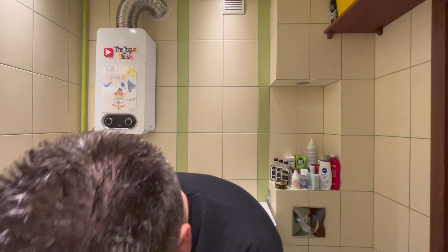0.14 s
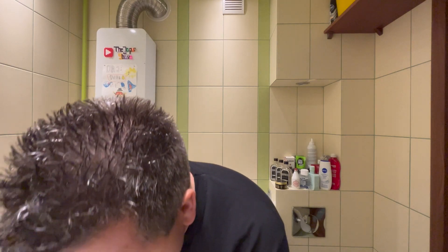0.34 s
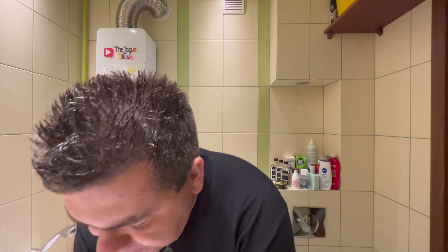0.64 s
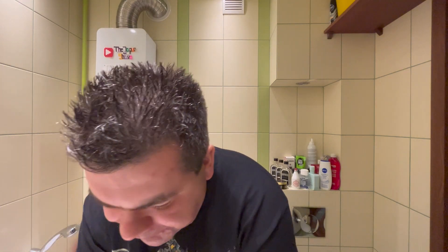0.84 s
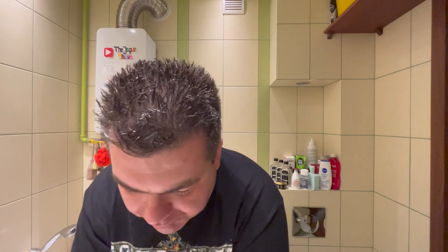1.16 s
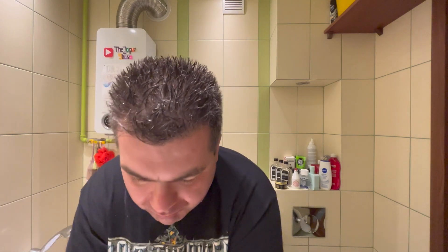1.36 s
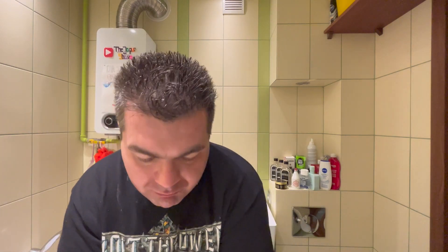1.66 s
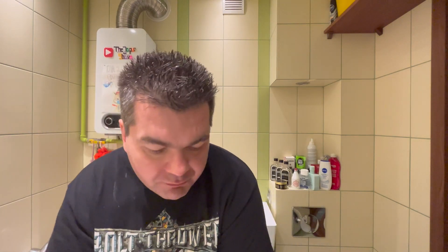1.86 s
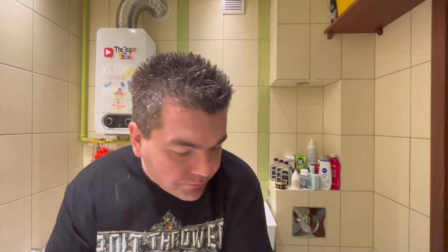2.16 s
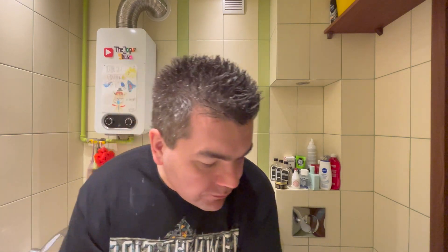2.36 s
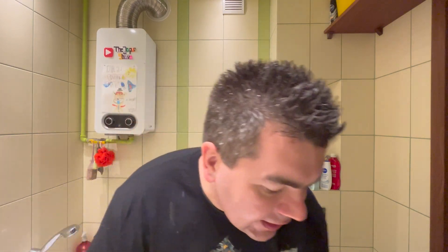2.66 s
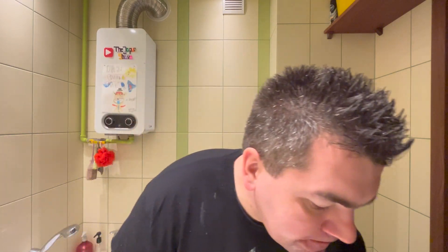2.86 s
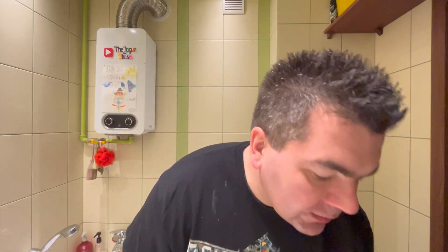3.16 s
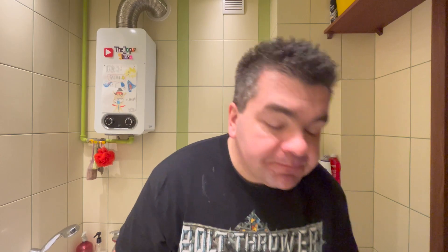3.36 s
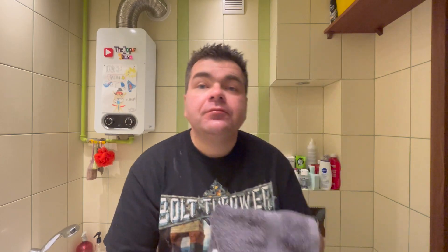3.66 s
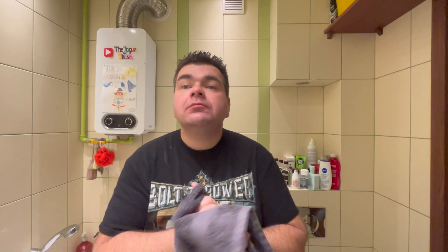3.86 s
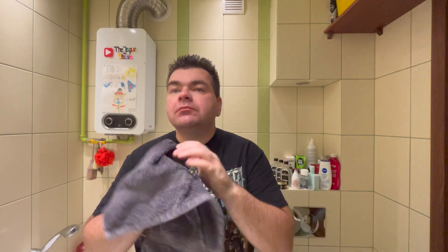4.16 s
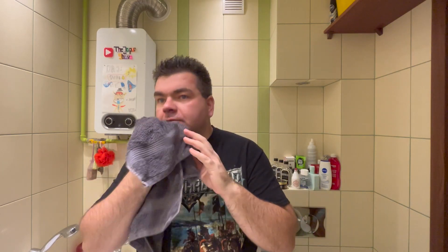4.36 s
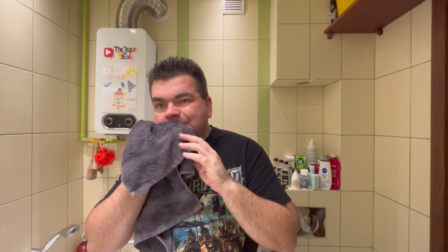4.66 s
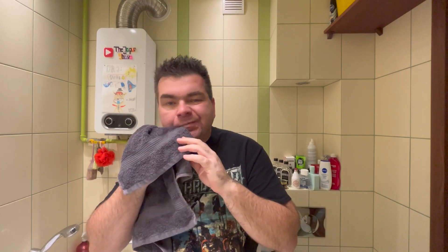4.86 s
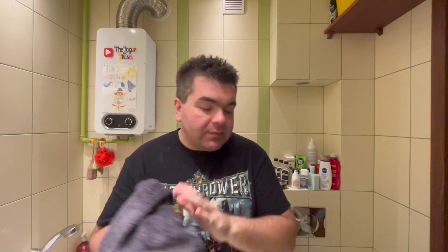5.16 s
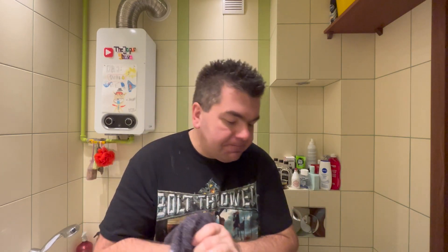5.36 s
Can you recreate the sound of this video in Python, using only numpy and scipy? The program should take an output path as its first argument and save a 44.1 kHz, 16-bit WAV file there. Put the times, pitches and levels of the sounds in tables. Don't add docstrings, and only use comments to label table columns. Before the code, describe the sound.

A close stereo sound in a small tiled bathroom, stronger on the right, with brief dense echoes. From about 0.1 s something wet plunges into a basin, with a hard splash near 0.23 s. Stirring follows in uneven bursts: ringing bubbles, squelchy pops, churning and bright crackling slaps, strongest around 0.65, 0.76 and 0.95 s. It thins after 1.3 s, with one last sharp splash at 1.68 s and low soft bumps as the water is left by 1.9 s. Small high drips tick from 2.1 s. A crisp flick at 2.45 s sets off a short low hum, more drops patter until 2.75 s, and a second snappy flick comes at 3.1 s. Then it is much quieter: towel fibres rustle and rub in soft swells, with weight shifting on the floor around 3.6 to 3.9 s. A faint click at 5.04 s precedes a dull low thud at 5.2 s and final cloth movement.

```python
import sys
import numpy as np
from scipy import signal
from scipy.fft import rfft, irfft
from scipy.io import wavfile

SR = 44100
rng = np.random.default_rng(int(sys.argv[2]) if len(sys.argv) > 2 else 0)


def int16_out(signal):
    q = np.round(np.clip(np.atleast_2d(signal).T, -1, 1) * 32767)
    wavfile.write(sys.argv[1], SR, q.astype(np.int16))


def nominal_scale(level):
    x = np.asarray(level, float) / 20
    return 10 ** x


N = 242991
TIME = np.arange(N) / SR
WATER_ENDS_S = 1.92


def rms_one(x):
    return x / np.sqrt(np.mean(x ** 2) + 1e-20)


def at_hz(points, hz):
    table_hz, values = np.transpose(points)
    return np.interp(np.log(hz + 1), np.log(table_hz), values)


def coloured(x, spectrum):
    length = x.shape[-1]
    gain = nominal_scale(at_hz(spectrum, np.fft.rfftfreq(length, 1 / SR)))
    return irfft(rfft(x) * gain, length)


def filtered(x, order, hz, kind):
    return signal.sosfilt(signal.butter(order, hz, kind, fs=SR, output="sos"), x)


def resonate(x, hz, width_hz):
    r = np.exp(-np.pi * width_hz / SR)
    return signal.lfilter([(1 - r * r) / 2, 0, (r * r - 1) / 2], [1, -2 * r * np.cos(2 * np.pi * hz / SR), r * r], x)


def add(out, s, sound):
    i = round(s * SR)
    out[..., i:i + sound.shape[-1]] += sound[..., :N - i]


def panned(x, left_db):
    lag_s = 0.000285
    samples = np.arange(len(x))
    late = np.interp(samples - lag_s * SR, samples, x)
    return np.array([x, late]) * nominal_scale(np.array([[left_db], [-left_db]]) / 2)


def drift(per_s):
    return rms_one(filtered(rng.standard_normal(N + SR), 2, per_s, "low")[SR:])


def swells(peak_s, rise_s, fall_s, peak_db, under_db):
    drop_db, curve = 22, 1.32
    t = TIME[::40, None]
    before = (peak_s - t) / np.maximum(rise_s, .005)
    after = (t - peak_s) / np.maximum(fall_s, .005)
    away = np.minimum(np.maximum(before, after), 9)
    power = nominal_scale(2 * (peak_db - drop_db * away ** curve)).sum(axis=1)
    return 10 * np.log10(nominal_scale(2 * under_db) + np.interp(TIME, t[:, 0], power))


# [peak t/s, fall/s, cloth rumble level/dB, footfall level/dB]
WEIGHT_SHIFTS = [(0.4, 0.76, -70, -76), (0.88, 0.41, -59.5, -74), (1.19, 0.66, -54.5, -59.5),
                 (1.4, 0.2, -57, -68), (1.73, 0.31, -53.5, -61), (2.02, 0.14, -57.5, -65),
                 (2.49, 0.16, -92, -58.5), (2.85, 0.24, -67.5, -89), (3.11, 0.38, -61.5, -67),
                 (3.62, 0.14, -55, -53), (3.7, 0.14, -48, -53.5), (3.87, 0.17, -56.5, -54),
                 (4.1, 0.12, -55.5, -80), (4.22, 0.34, -63.5, -62), (4.8, 0.98, -65.5, -70),
                 (5.17, 0.043, -57, -70), (5.228, 0.088, -37, -34.5), (5.36, 0.15, -57, -58),
                 (5.49, 0.074, -50.5, -50.5)]
RISE_SHARE, STILL_RUMBLE_DB, STILL_FLOOR_DB = 0.83, -82, -85
HEAVY_STEP_DB, HEAVY_QUICKENING = -51.5, 0.5


def weight():
    s, fall, rumble_db, footfall_db = np.transpose(WEIGHT_SHIFTS)
    heaviness_db = np.maximum(footfall_db - HEAVY_STEP_DB, 0)
    rise = RISE_SHARE * fall * nominal_scale(-HEAVY_QUICKENING * heaviness_db)
    return (swells(s, rise, fall, rumble_db, STILL_RUMBLE_DB),
            swells(s, rise, fall, footfall_db, STILL_FLOOR_DB))


# [f/Hz, density/dB per Hz]
CLOTH_RUMBLE = [(59, -56.5), (100, -26), (199, 9), (232, -3.5), (318, 4), (500, -0.5), (650, -4),
                (1100, -120)]
# [f/Hz, density/dB per Hz]
FLOOR_TREAD = [(13, -33), (22, -24.5), (47, 2.5), (120, 5), (160, -5.5), (260, -120)]


def rumble():
    total = 0
    for level_db, spectrum in zip(weight(), [CLOTH_RUMBLE, FLOOR_TREAD]):
        mid, side = rng.standard_normal((2, N))
        noise = rms_one(coloured(mid + 0.4 * side * [[1], [-1]], spectrum))
        total = total + nominal_scale(level_db + 0.5 * drift(4.6)) * noise
    return total


# [t/s, level/dB]
HAND_EFFORT = [
    (0.096, -58),
    (0.156, -47.5),
    (0.27, -36.5),
    (0.33, -38.5),
    (0.51, -41.5),
    (0.8, -40.5),
    (1.194, -41),
    (1.33, -48.5),
    (1.624, -59),
]


def stirring():
    return np.interp(TIME, *np.transpose(HAND_EFFORT), left=-120, right=-120)


# [peak t/s, rise/s, fall/s, rustle level/dB, hiss level/dB]
MOVEMENTS = [(0.0, .1, 0.15, -53.5, -50), (1.697, 0.15, 0.3, -47, -49), (2.03, 0.15, 0.21, -56.5, -61.5),
             (2.11, 0.064, 0.1, -58.5, -62), (2.471, 0.12, 0.2, -60, -47.5), (2.784, 0.18, 0.5, -60.5, -60),
             (3.1, 0.36, 0.58, -55, -62), (3.42, 0.048, 0.18, -64.5, -87), (3.672, 0.22, 0.41, -52, -54.5),
             (4.06, 0.25, 0.23, -52, -56), (4.31, 0.01, 0.81, -75, -85), (4.375, 0.04, 0.096, -60, -68),
             (4.57, 0.04, 0.18, -64, -64), (4.65, 0.13, 0.13, -62.5, -57), (4.89, 0.23, 0.23, -56, -61),
             (5.039, 0.0067, 0.24, -59, -64), (5.224, 0.054, 0.23, -51.5, -56.5),
             (5.38, 0.066, 0.27, -59, -53.5), (5.49, 0.19, 0.12, -44.5, -55)]
STILL_RUSTLE_DB, STILL_HISS_DB = -82, -72.5


def motion():
    s, rise, fall, rustle_db, hiss_db = np.transpose(MOVEMENTS)
    plunge_s, plunge_length_s = 0.28, 0.021
    depth_db = np.interp(TIME, [plunge_s, plunge_s + plunge_length_s], [-22, 1])
    slosh_under_db = np.maximum(stirring() + depth_db, STILL_RUSTLE_DB)
    spray_under_db = np.maximum(stirring(), STILL_HISS_DB)
    return swells(s, rise, fall, rustle_db, slosh_under_db), swells(s, rise, fall, hiss_db, spray_under_db)


def grains(per_s, low_hz, high_hz, cycles, spread_db):
    sizes = nominal_scale(spread_db * np.minimum(rng.exponential(1, N), 3)) * rng.choice([-1, 1], N)
    clicks = sizes * (rng.random(N) < per_s / SR) + 1e-18
    dealt = rng.integers(0, 14, N)
    total = 0
    for k, hz in enumerate(np.geomspace(low_hz, high_hz, num=14)):
        total = total + resonate(clicks * (dealt == k), hz, 1.8 * hz / cycles) / np.sqrt(hz)
    return rms_one(total)


def patchy(x, edges_hz, depth_db, per_s):
    depth_db = depth_db * np.where(TIME < WATER_ENDS_S, 1, 0.5)
    total = 0
    for k, band_hz in enumerate(zip(edges_hz, edges_hz[1:])):
        total = total + (-1) ** k * filtered(x, 2, band_hz, "band") * nominal_scale(depth_db * drift(per_s))
    return total


def water_then_towel(mix, wet, dry):
    share = np.clip((TIME - WATER_ENDS_S) / 0.011, 0, 1)
    return (1 - share) * rms_one(coloured(mix, wet)) + share * rms_one(coloured(mix, dry))


# [f/Hz, density/dB per Hz]
SPRAY_COLOUR = [(500, -62), (1200, -37), (2000, -39), (2800, 1.5), (4300, -4.5), (5400, -6), (6400, -1.5),
                (7500, -7.5), (10000, -6.5), (12600, -31), (14800, -16), (16000, -21.5)]
# [f/Hz, density/dB per Hz]
FIBRE_COLOUR = [(500, -54), (1200, -5.5), (2000, -10.5), (2800, -14.5), (4300, -11.5), (5600, -12),
                (6000, -6.5), (6700, -7.5), (7200, -11), (10000, -10.5), (12600, -25), (14800, -19),
                (16000, -20.5)]


def spray(level_db):
    fizz = grains(600, 2400, 7500, cycles=14.0, spread_db=4.0)
    mix = rng.standard_normal((2, N)) + 0.55 * panned(fizz, 0)
    mix = patchy(mix, [900, 2600, 3500, 4600, 5800, 7200, 9000, 11000, 13500, 17000], 2.8, 16)
    return nominal_scale(level_db) * water_then_towel(mix, SPRAY_COLOUR, FIBRE_COLOUR)


# [f/Hz, density/dB per Hz]
SLOSH_COLOUR = [(180, -70), (300, -21.5), (556, 0), (790, -7.5), (1050, 0), (1240, 1.5), (1530, 4),
                (3000, -8.5), (3900, -10.5), (6600, -120)]
# [f/Hz, density/dB per Hz]
CLOTH_COLOUR = [(180, -1), (300, -4), (550, -7.5), (742, -6), (801, -4.5), (1320, -7), (3000, -21),
                (3900, -16.5), (6600, -120)]


def slosh(level_db):
    mix = rng.standard_normal((2, N)) + 0.08 * grains(900, 402, 2830, cycles=10.0, spread_db=6.0)
    mix = patchy(mix, [150, 500, 800, 1200, 1700, 2400, 5000], 2.5, 18)
    return nominal_scale(level_db) * water_then_towel(mix, SLOSH_COLOUR, CLOTH_COLOUR)


# [t/s, peak level/dB, f/Hz, swell/s, T60/s]
BASIN_HUMS = [
    (2.455, -38, 165, 0.01, 0.15),
    (3.9, -57, 177, 0.0089, .08),
    (2.32, -60, 210, 0.009, 0.074),
]


def hums():
    out, t = np.zeros(N), TIME[:SR // 3]
    for s, level_db, hz, swell_s, t60 in BASIN_HUMS:
        envelope = nominal_scale(level_db - 60 * t / t60) * (1 - np.exp(-(t / swell_s) ** 2))
        add(out, s, envelope * np.sin(2 * np.pi * hz * t * (1 - .5 * t)))
    return out


# [t/s, peak level/dB, f/Hz, decay/s, puff share/dB]
SOFT_BLOWS = [(1.65, -40, 573, 0.079, 1), (1.694, -45.5, 102, 0.033, -13), (1.775, -40, 122, 0.032, 2.5),
              (1.994, -46.5, 202, 0.033, 6), (2.108, -28.5, 196, 0.0042, -17),
              (2.75, -55.5, 325, 0.015, -12), (3.117, -29.5, 410, 0.013, -2.5),
              (3.465, -46, 1160, 0.0058, -17), (3.563, -46, 495, 0.016, 6), (2.06, -60, 2040, 0.057, -12),
              (4.009, -49, 750, 0.14, 15), (4.289, -46.5, 504, 0.023, 3), (5.21, -32, 430, 0.018, 11),
              (5.228, -39, 65.6, 0.025, 6)]


def thuds():
    out, t = np.zeros(N), TIME[:SR // 4]
    for s, level_db, hz, decay_s, puff_db in SOFT_BLOWS:
        white = rng.standard_normal(len(t))
        puff = filtered(white, 3, [150, 1100], "band")
        ring = resonate(resonate(white, hz, 10 + .2 * hz), hz, 10 + .4 * hz)
        blow = rms_one(rms_one(ring) + nominal_scale(puff_db) * rms_one(puff))
        envelope = (1 - np.exp(-t * hz / 1.9)) * np.exp(-t / max(decay_s, .003))
        add(out, s - .001, nominal_scale(level_db - 1) * envelope * blow)
    return out


# [f/Hz, density/dB per Hz]
SPLASH_COLOUR = [(500, -70), (1200, -32.5), (2000, 4), (4000, 0), (6400, 3), (8400, 13), (11000, 2),
                 (13000, -2), (16000, -5.5)]
# [t/s, peak level/dB, f/Hz, T60/s]
DROPS = [(0.1008, -37, 4300, 0.05), (2.113, -42.5, 5060, .05), (2.1899, -40.5, 4900, 0.063),
         (2.2313, -45.5, 4730, .04), (2.3018, -41, 4920, 0.075), (2.4047, -44, 6600, 0.038),
         (2.505, -38, 3950, .06), (2.549, -46, 3620, .05), (2.605, -41, 3620, 0.064),
         (2.622, -38.5, 5000, 0.06), (2.6673, -43, 6600, .015), (2.695, -26.5, 6700, 0.014),
         (2.7402, -32.5, 4630, 0.024), (3.3937, -54, 5000, .015), (3.4194, -53, 5070, 0.017),
         (3.487, -56, 6200, .015), (5.037, -47, 6860, 0.018), (5.037, -46, 4830, 0.014)]


def drips():
    out, t = np.zeros(N), TIME[:SR // 10]
    sag_per_s = 2.7
    for s, level_db, hz, t60 in DROPS:
        tick = rng.standard_normal(len(t)) * nominal_scale(-60 * t / max(t60, .005))
        sound = resonate(resonate(tick, hz, 700), hz, 700) + 0.047 * coloured(tick, SPLASH_COLOUR)
        sound = np.interp(t * (1 - sag_per_s * t / 2), t, sound)
        add(out, s - .001, nominal_scale(level_db - 4.5) * sound / np.abs(sound).max())
    return out


# [f/Hz, density/dB per Hz]
SNAP_COLOUR = [(500, -60), (1200, -33), (2000, -6), (4000, -5.5), (6400, -2.5), (8400, 5), (11000, -0.5),
               (13000, 1), (16000, -3)]
# [t/s, peak level/dB, low cavity f/Hz, body share/dB, decay/s]
BASIN_SPLASHES = [(0.135, -36, 2520, 3, 0.046), (0.1537, -28, 4540, 13, 0.018),
                  (0.23, -9, 5180, -32.5, 0.0043), (0.2541, -22.5, 3120, 12.5, 0.01),
                  (0.3649, -23, 3700, -23.5, .038), (0.5207, -45, 3780, -18, 0.013),
                  (0.561, -21, 2410, -21, 0.0063), (0.6176, -34, 4180, -13, 0.0077),
                  (0.6446, -14, 2380, 0.5, 0.01), (0.7595, -8.5, 4900, 6, 0.0047),
                  (0.7652, -10.5, 3700, 1, 0.007), (0.8266, -25, 3050, -10, 0.016),
                  (0.833, -16.5, 3200, -15, 0.0078), (0.8396, -16, 2900, -14, 0.013),
                  (0.859, -21.5, 3800, -2, 0.014), (0.9533, -13, 2360, 2.5, 0.012),
                  (1.0262, -31, 2300, 24, 0.023), (1.0362, -23.5, 2900, 9, 0.031),
                  (1.156, -18.5, 2220, -23, 0.026), (1.2606, -25, 4100, -3.5, 0.011),
                  (1.366, -32, 4000, -5, 0.01), (1.3716, -22, 3100, 7, 0.021),
                  (1.4948, -28, 4370, -27, 0.034), (1.6794, -7, 5570, -35, 0.005),
                  (1.689, -23.5, 4480, -23, 0.029), (1.7696, -42, 2260, 18, 0.045)]
# [t/s, peak level/dB, low cavity f/Hz, body share/dB, decay/s]
AIR_FLICKS = [(2.359, -44.5, 5130, -23, 0.02), (2.4433, -26, 4580, -9, 0.013),
              (2.4479, -20.5, 4670, -6, 0.016), (2.455, -25.5, 4200, -6.5, 0.029),
              (2.6948, -31, 4600, -30, 0.0067), (2.7395, -38.5, 4330, 5, 0.026),
              (3.0824, -23.5, 7160, -30, 0.02), (3.0895, -23, 6930, -15, 0.012),
              (3.099, -20, 5190, -3.5, 0.011), (3.1151, -24.5, 4570, 5.5, 0.028),
              (5.036, -45.5, 3000, 11, 0.016)]
# [t/s, f/Hz]
HIGH_CAVITY_PITCH = [
    (0.1, 5600),
    (0.3, 5140),
    (1.0, 6100),
    (1.5, 6700),
    (1.9, 6630),
    (2.45, 8170),
    (2.65, 6550),
    (3.1, 6330),
]


def splashes():
    out, t = np.zeros((2, N)), TIME[:SR // 4]
    width = 0.53
    for s, level_db, low_hz, body_db, decay_s in BASIN_SPLASHES + AIR_FLICKS:
        wet = s < WATER_ENDS_S
        high_hz = np.interp(s, *np.transpose(HIGH_CAVITY_PITCH))
        crackle = rng.standard_normal(len(t) // 30 + 1).repeat(30)[:len(t)]
        white = rng.standard_normal((2, len(t))) * nominal_scale(1.57 * crackle)
        bright = rms_one(coloured(white[0], SPLASH_COLOUR if wet else SNAP_COLOUR))
        bright = rms_one(bright + 4.07 * resonate(bright, high_hz, 900) - 7.2 * resonate(bright, low_hz, 600))
        body = rms_one(resonate(resonate(white[1], 1470, 1200), 1470, 1200))
        rising = 1 - np.exp(-t / (.003 if wet else .0012))
        shape = rising * np.exp(-t / max(decay_s, .002))
        sound = panned(nominal_scale(level_db - 7) * shape * (bright + nominal_scale(body_db - 6.5) * body), -1.5)
        other_drops = nominal_scale(level_db - 3) * shape * bright[::-1]
        sound[0] = (1 - width) * sound[0] + width * other_drops
        add(out, s - .001, sound)
    return out


# [t/s, peak level/dB, f/Hz]
SNAPPING_POCKETS = [(0.106, -35.5, 1290), (0.144, -27.5, 1110), (0.165, -38.5, 1940), (0.165, -20, 1550),
                    (0.228, -22.5, 1550), (0.248, -25, 1710), (0.301, -40.5, 1310), (0.332, -36, 1400),
                    (0.384, -22.5, 990), (0.422, -21, 1140), (0.443, -21.5, 1146), (0.519, -26, 1560),
                    (0.557, -21.5, 2400), (0.557, -17, 2390), (0.618, -26, 1250), (0.648, -18.5, 1134),
                    (0.719, -26, 1690), (0.74, -10.5, 1080), (0.758, -12.5, 946), (0.823, -25.5, 1010),
                    (0.844, -24, 1160), (0.928, -37, 1140), (0.952, -11.5, 1140), (1.025, -13, 1640),
                    (1.12, -19, 1400), (1.131, -23.5, 966), (1.159, -11.5, 1360), (1.214, -35, 1720),
                    (1.245, -25, 1070), (1.261, -20.5, 1530), (1.343, -14.5, 1030), (1.367, -10.5, 1730),
                    (1.495, -28, 1410), (1.602, -49, 1610), (1.61, -35, 1730), (1.646, -27, 845),
                    (1.648, -28, 501), (1.656, -21.5, 546), (1.666, -39, 587), (1.678, -20.5, 583),
                    (1.732, -36, 1920), (1.75, -23.5, 624), (1.76, -20.5, 1450)]


def pops():
    out, t = np.zeros(N), TIME[:SR // 20]
    cycles, trim_db = 11.6, -6.5
    for s, level_db, hz in SNAPPING_POCKETS:
        tone = np.sin(2 * np.pi * hz * t * (1 + 8.0 * t)) * nominal_scale(-60 * t * hz / cycles)
        add(out, s - .001, nominal_scale(level_db + trim_db) * tone)
    return filtered(out, 3, 350, "high")


# [t/s, peak level/dB, f/Hz, longer ring/dB]
SMALL_POCKETS = [(0.0898, -38.5, 1255, -6), (0.1029, -29, 1246, -6.5), (0.1674, -14, 1650, -7.5),
                 (0.1793, -19, 1520, -6.5), (0.1852, -24, 1462, -2), (0.202, -30.5, 1445, 3),
                 (0.228, -21, 1592, -4), (0.3041, -29, 1313, -3), (0.3304, -32, 1380, -1),
                 (0.3906, -28.5, 2036, 0), (0.4437, -21.5, 1540, -2), (0.5216, -23.5, 1505, -4),
                 (0.5576, -24.5, 2270, -1), (0.616, -33, 1230, -3), (0.6465, -28.5, 2166, 0),
                 (0.7211, -18, 1634, 2), (0.736, -29, 1700, -4.5), (0.8585, -22, 1728, -4),
                 (0.9513, -22, 2230, -2), (1.024, -20, 1657, 0), (1.046, -23, 1800, -2),
                 (1.1209, -19, 1393, 0), (1.14, -25, 1454, 0.5), (1.163, -18.5, 1344, -1),
                 (1.178, -29, 1440, -4), (1.26, -18.5, 1500, -1.5), (1.344, -33, 1295, -10.5),
                 (1.3721, -19.5, 1650, -5.5), (1.494, -34.5, 1394, -10.5), (1.6013, -43, 1550, -5),
                 (1.6474, -39, 1930, 0.5), (1.6786, -33.5, 1885, -3), (1.681, -27, 1380, -3.5),
                 (1.732, -38.5, 2030, -1), (1.749, -39, 1683, 2), (1.772, -33, 1496, -5),
                 (1.785, -28.5, 1406, 1.5), (1.822, -41.5, 1604, 2.5)]
# [t/s, peak level/dB, f/Hz, longer ring/dB]
MIDDLE_POCKETS = [(0.106, -41, 1360, 0), (0.152, -29.5, 1179, 3.5), (0.21, -43, 1170, 0),
                  (0.227, -29, 1267, 0), (0.249, -32, 928, -7), (0.387, -16, 953, -1.5),
                  (0.424, -29, 1130, -2), (0.444, -24, 1034, -3.5), (0.557, -19.5, 1033, -2.5),
                  (0.619, -29, 1265, 1), (0.651, -20.5, 1230, 0.5), (0.718, -29, 1045, 2),
                  (0.741, -15.5, 1110, -0.5), (0.759, -25.5, 944, -4), (0.824, -32.5, 921, 1),
                  (0.844, -17.5, 1150, -1), (0.93, -21.5, 1090, -4), (0.954, -22, 1037, -1.5),
                  (1.032, -18, 1160, 0.5), (1.118, -32, 1024, -6), (1.133, -19.5, 1000, 0),
                  (1.16, -19.5, 1185, -2), (1.232, -34, 1260, -7.5), (1.246, -25, 1040, -4),
                  (1.261, -23.5, 1080, -1), (1.343, -33, 960, -11), (1.656, -38, 1120, 4),
                  (1.763, -34.5, 906, -2)]
# [t/s, peak level/dB, f/Hz, longer ring/dB]
LARGE_POCKETS = [(0.318, -31.5, 605, -1), (0.386, -26.5, 548, -1.5), (0.436, -25, 626, 1),
                 (0.645, -35, 623, -3), (0.722, -28, 510, 3.5), (0.758, -21.5, 521, 0.5),
                 (0.839, -25.5, 511, 0.5), (0.953, -25, 628, -2.5), (1.033, -29, 570, -2),
                 (1.126, -30, 564, 0), (1.254, -37, 610, -1), (1.648, -36, 573, 1), (1.676, -28, 565, -2),
                 (1.692, -30.5, 590, -3), (1.75, -39, 532, -1)]
CYCLES_TO_DIE = [
    83,
    43,
    20.4,
]
FROTH_S, CLEAR_RING_DB = 0.28, 6
DRAINED_S, DRAINED_RING_DB = 1.5, -5.5
BURST_DAMPING, STIR_DAMPING = 0.76, 0.2


def pockets():
    stir_db = np.maximum(stirring(), -55) + 42
    found = []
    for size, cycles in zip([SMALL_POCKETS, MIDDLE_POCKETS, LARGE_POCKETS], CYCLES_TO_DIE):
        for s, level_db, hz, ring_db in size:
            ring_db = ring_db + CLEAR_RING_DB * (s < FROTH_S) + DRAINED_RING_DB * (s > DRAINED_S)
            ring_db -= BURST_DAMPING * (level_db + 24.5) + STIR_DAMPING * stir_db[round(s * SR)]
            found.append((s, level_db, hz, cycles / hz * nominal_scale(ring_db)))
    return found


def bubbles():
    out, t = np.zeros(N), TIME[:SR // 5]
    rise_per_s, onset_s, trim_db = 1.2, 0.00081, -1.5
    for s, level_db, hz, t60 in pockets():
        phase, other = rng.random(2)
        t60 = max(t60, .004)
        turns = hz * t * (1 + rise_per_s * t)
        twin = np.sin(2 * np.pi * (turns * (0.77 + 0.269 * other) + phase))
        tone = (np.sin(2 * np.pi * turns) + 0.68 * twin) * nominal_scale(-60 * t / t60)
        noise = resonate(resonate(rng.standard_normal(len(t)), hz, 0.23 * hz), hz, 0.42 * hz)
        squelch = rms_one(noise) * nominal_scale(-35 * t / t60)
        add(out, s - .001, nominal_scale(level_db + trim_db) * (1 - np.exp(-t / onset_s)) * (tone + 0.54 * squelch))
    return filtered(out, 3, 330, "high")


# [f/Hz, T60/s]
TILE_DECAY = [(100, 0.25), (500, 0.16), (2000, 0.22), (6000, 0.2), (12000, 0.1)]


def bathroom(x):
    t, echoes = TIME[:SR // 2], 0
    white = rng.standard_normal((2, len(t))) * np.minimum(t / 0.00018, 1)
    for hz in 62.5 * 2 ** np.arange(8.5):
        octave_hz = [hz / np.sqrt(2), min(hz * np.sqrt(2), .45 * SR)]
        pair = white if hz > 200 else white[0] + .4 * white
        echoes = echoes + filtered(rms_one(pair), 2, octave_hz, "band") * nominal_scale(-60 * t / at_hz(TILE_DECAY, hz))
    echoes = echoes / np.sqrt(np.sum(echoes ** 2) / 2)
    return nominal_scale(1) * signal.fftconvolve(x, echoes, axes=1)[:, :N]


def scene():
    slosh_db, spray_db = motion()
    gulps = bubbles() + pops()
    water_air = 0.73 * gulps + 0.095 * panned(gulps, 0)
    hits = water_air + panned(drips(), -7.0) + splashes() + thuds() + hums()
    room = bathroom(np.tile(hits.mean(axis=0), (2, 1)))
    return rumble() + spray(spray_db) + slosh(slosh_db) + room + hits


def roll_off(x):
    return signal.sosfilt(signal.butter(12, 16750, fs=SR, output="sos"), x)


# [f/Hz, left-right level/dB]
LEFT_OVER_RIGHT = [(60, -6.5), (200, 0), (380, -5.5), (700, 0.5), (1300, -4), (2400, -2.5), (4400, -12),
                   (8000, -6), (11000, 5)]
# [f/Hz, level/dB]
SUM_RESPONSE = [(9500, 2), (10600, -1.5), (11600, -3), (12500, -10), (13800, -11), (14400, 0), (15600, 7),
                (16000, -56.5)]
# [f/Hz, level/dB]
DIFFERENCE_RESPONSE = [(5000, 2.5), (9000, 0.5), (13600, 7.5), (14600, -15.5), (15500, -87.5)]


def record(dry):
    left = coloured(dry[0], np.multiply(LEFT_OVER_RIGHT, [1, .5]))
    right = coloured(dry[1], np.multiply(LEFT_OVER_RIGHT, [1, -.5]))
    mid = coloured(left + right, SUM_RESPONSE) / 2
    side = coloured(left - right, DIFFERENCE_RESPONSE) / 2
    pair = np.array([mid + side, mid - side])
    rounded = 0.61 * np.tanh(pair / 0.59)
    mix = signal.sosfilt(signal.cheby2(10, 60, 16750, fs=SR, output="sos"), rounded)
    return roll_off(mix)


dry = scene()
out = record(dry)
int16_out(out)
```